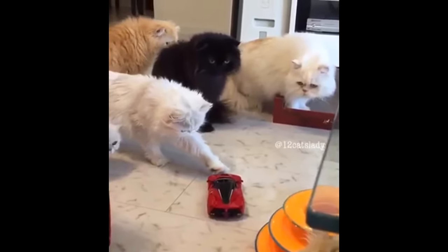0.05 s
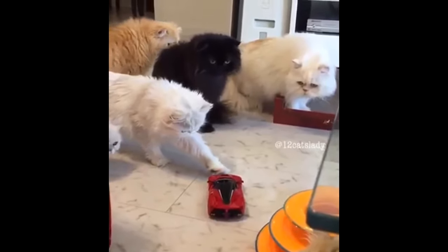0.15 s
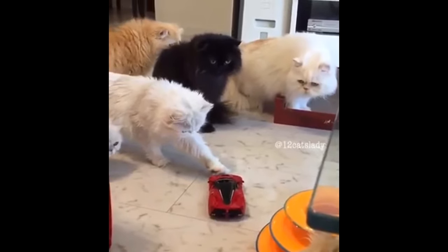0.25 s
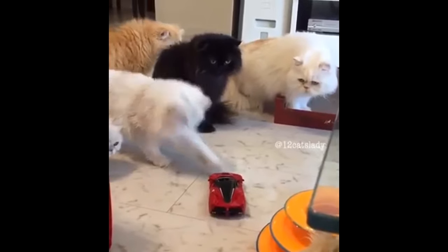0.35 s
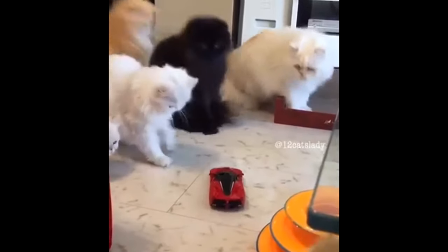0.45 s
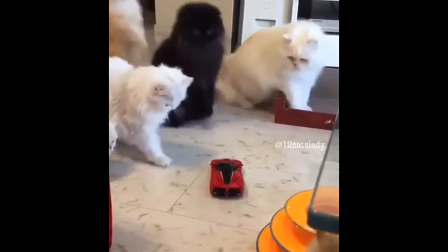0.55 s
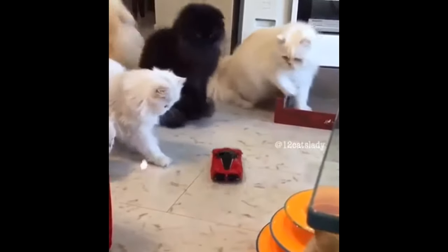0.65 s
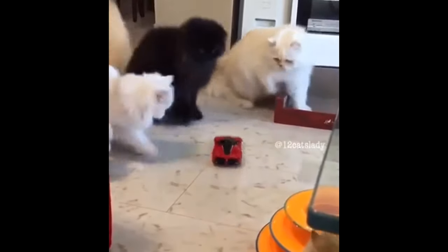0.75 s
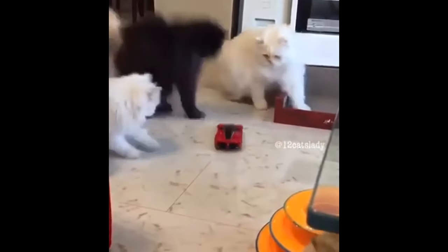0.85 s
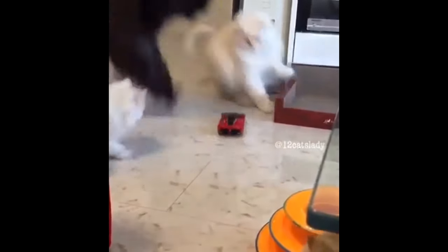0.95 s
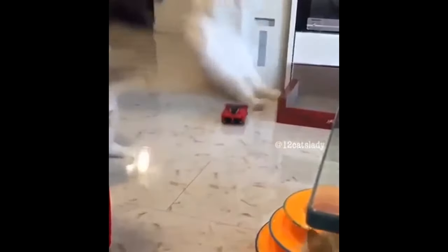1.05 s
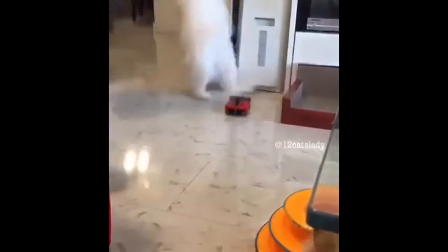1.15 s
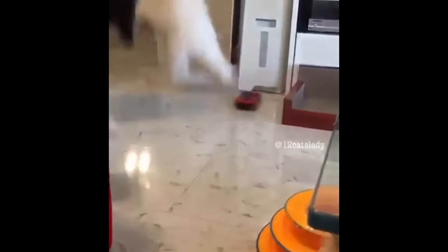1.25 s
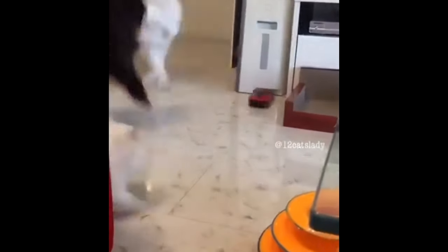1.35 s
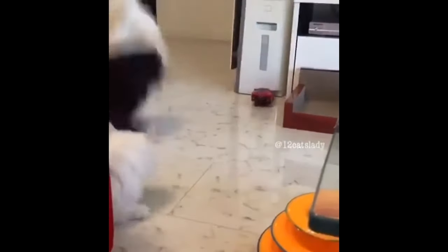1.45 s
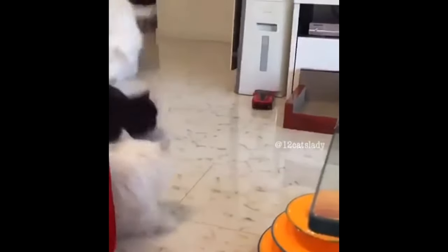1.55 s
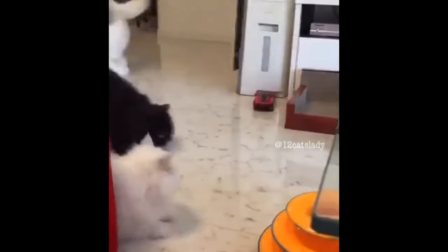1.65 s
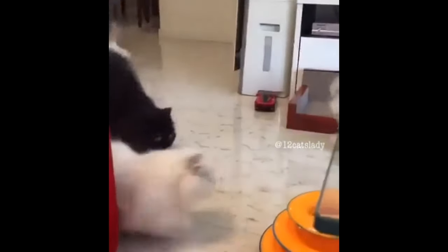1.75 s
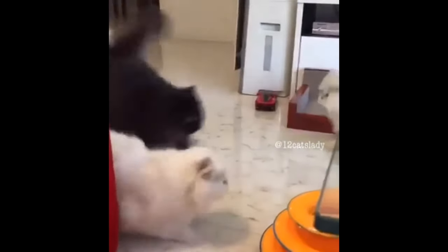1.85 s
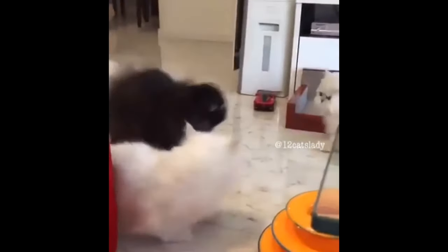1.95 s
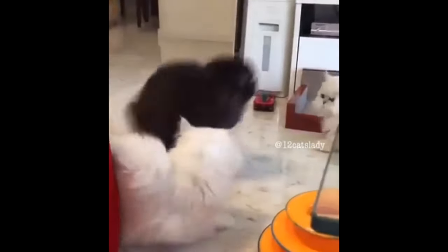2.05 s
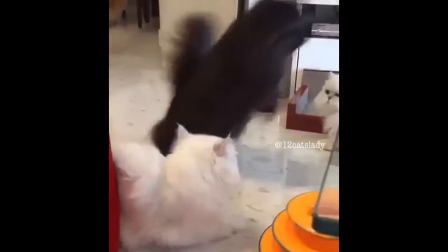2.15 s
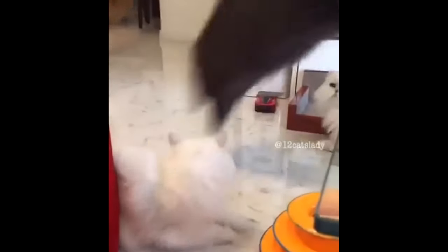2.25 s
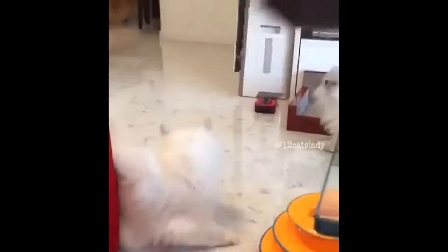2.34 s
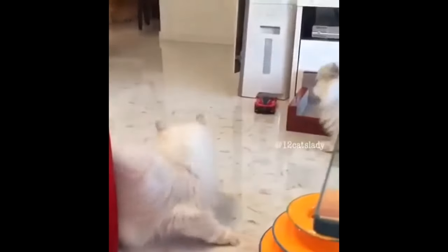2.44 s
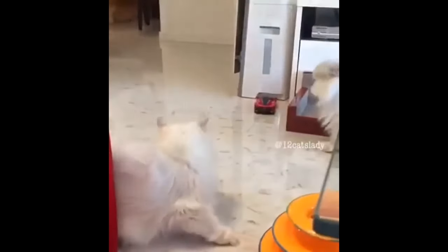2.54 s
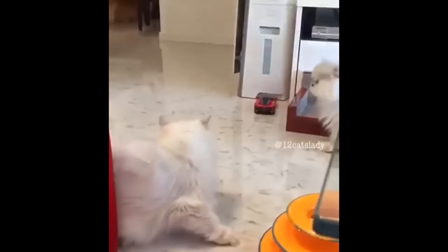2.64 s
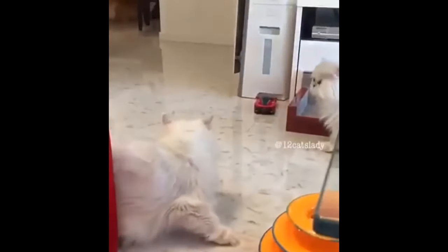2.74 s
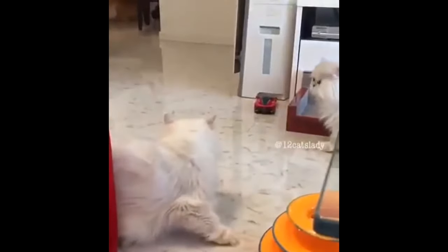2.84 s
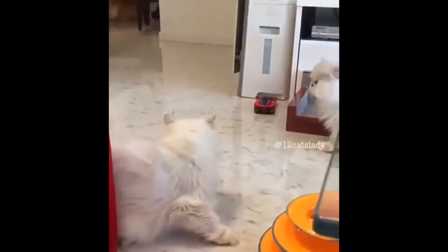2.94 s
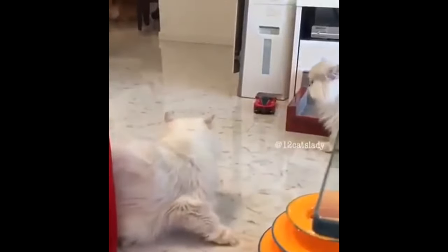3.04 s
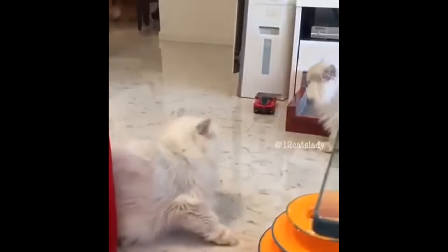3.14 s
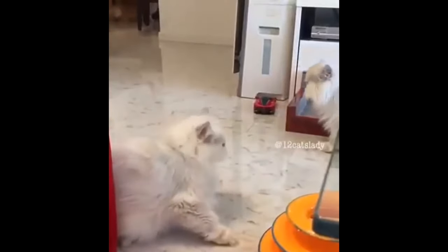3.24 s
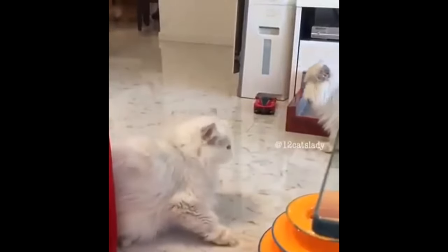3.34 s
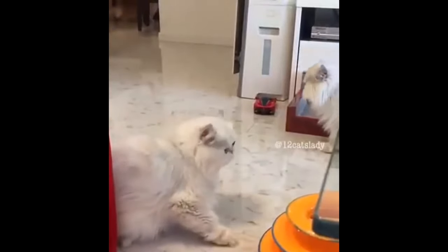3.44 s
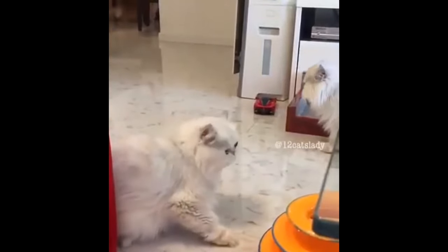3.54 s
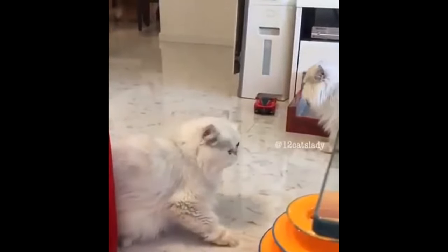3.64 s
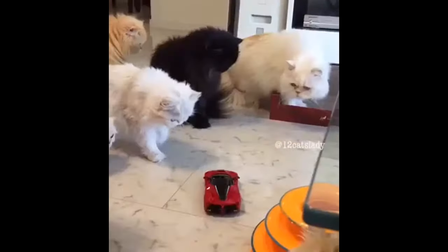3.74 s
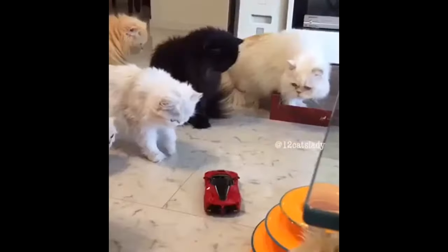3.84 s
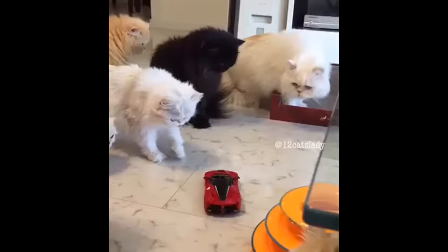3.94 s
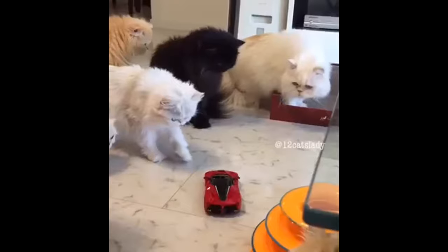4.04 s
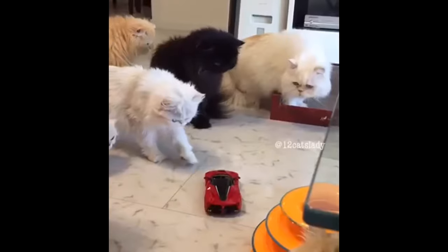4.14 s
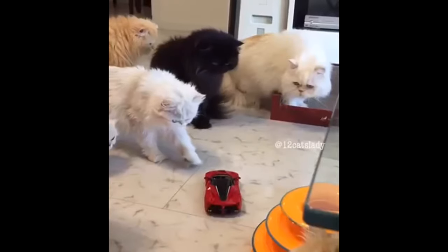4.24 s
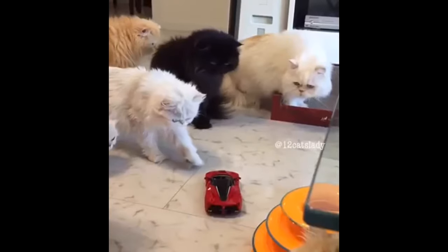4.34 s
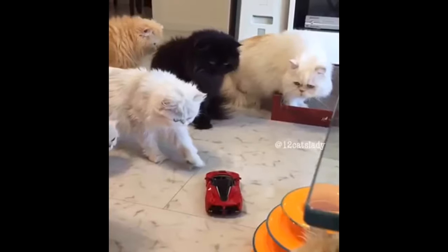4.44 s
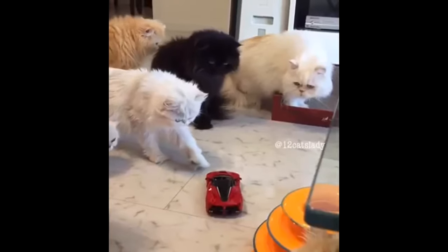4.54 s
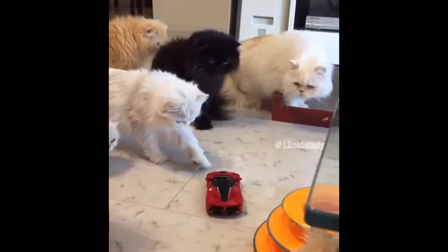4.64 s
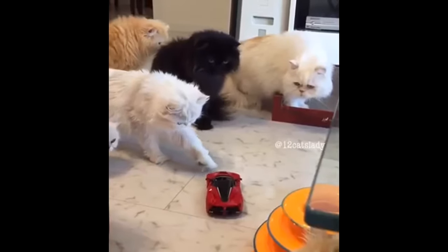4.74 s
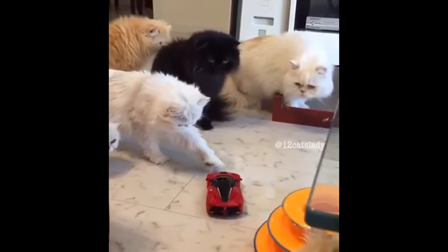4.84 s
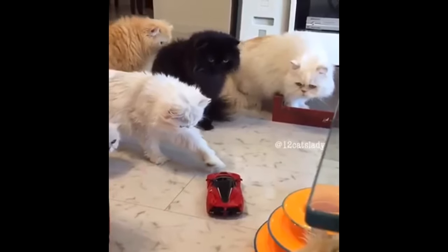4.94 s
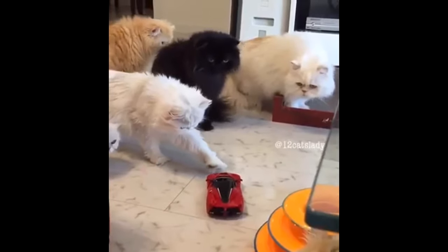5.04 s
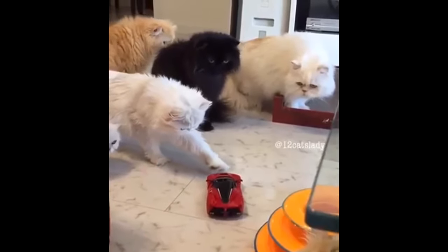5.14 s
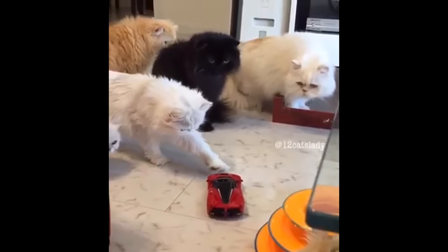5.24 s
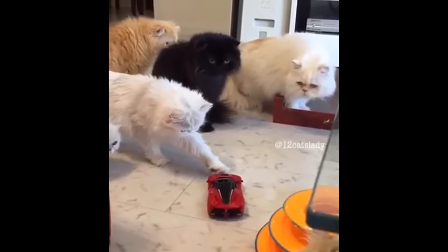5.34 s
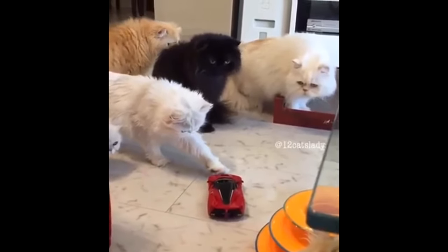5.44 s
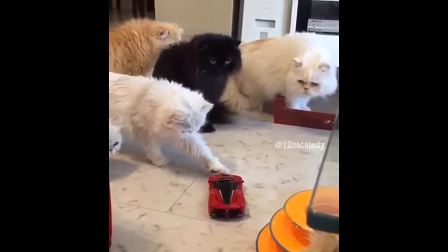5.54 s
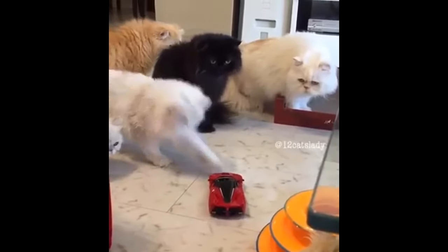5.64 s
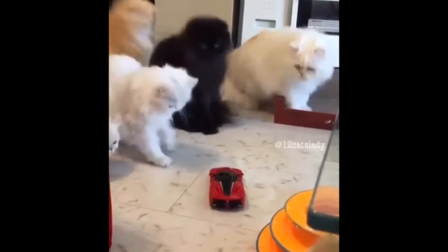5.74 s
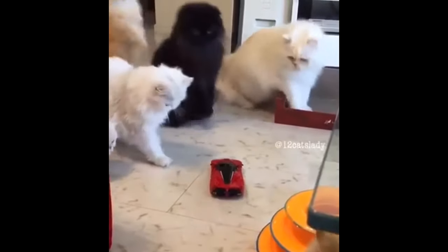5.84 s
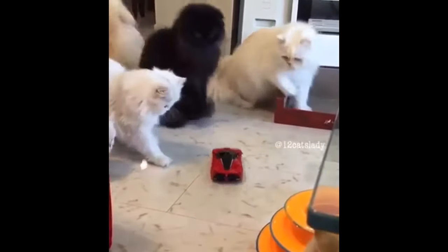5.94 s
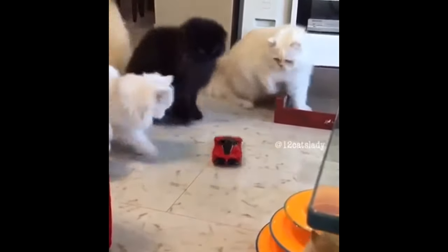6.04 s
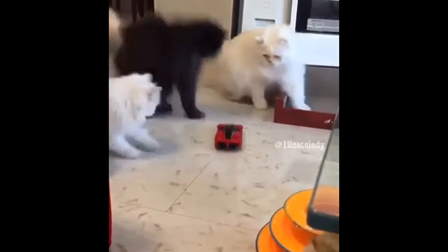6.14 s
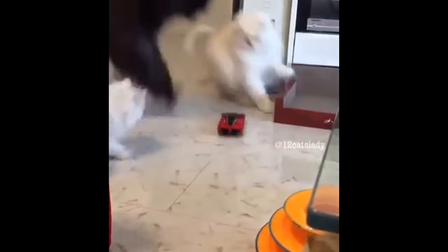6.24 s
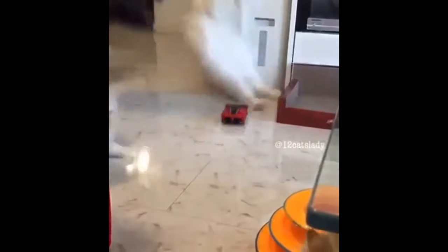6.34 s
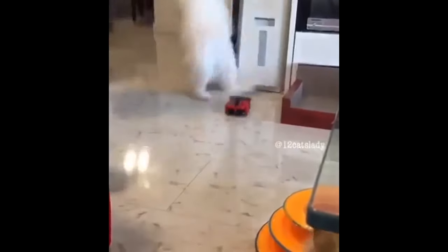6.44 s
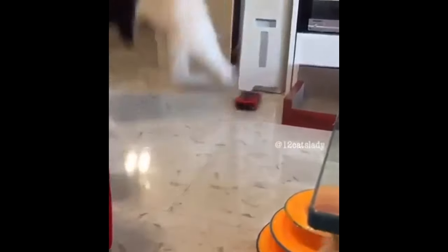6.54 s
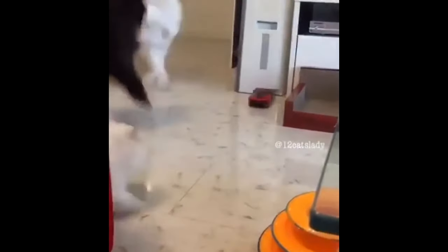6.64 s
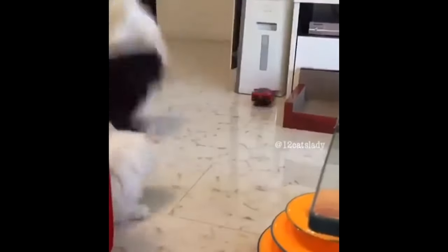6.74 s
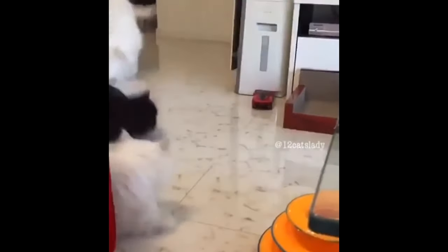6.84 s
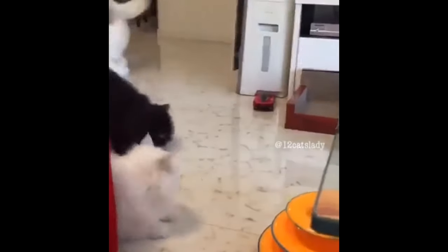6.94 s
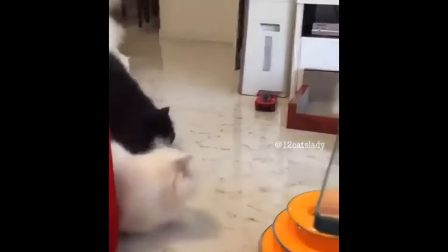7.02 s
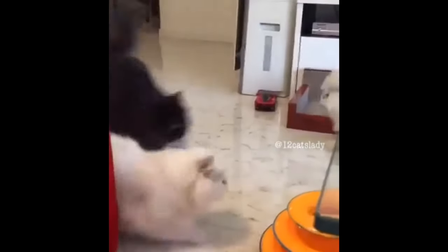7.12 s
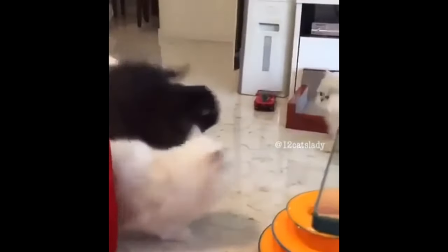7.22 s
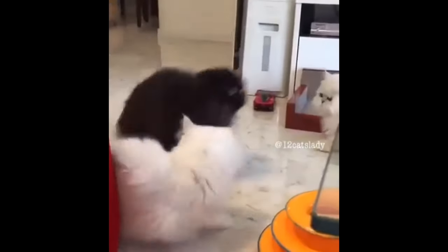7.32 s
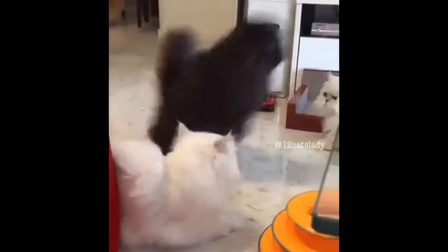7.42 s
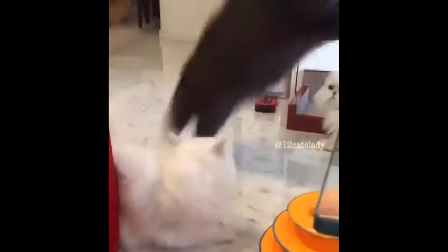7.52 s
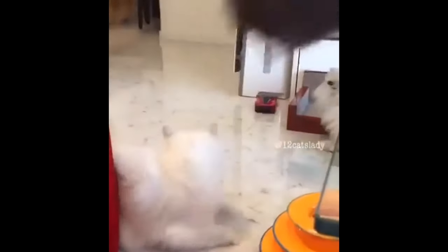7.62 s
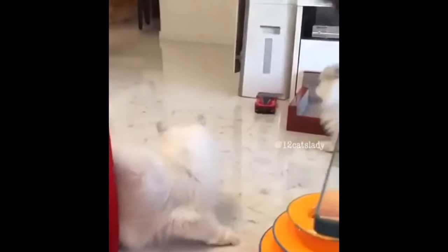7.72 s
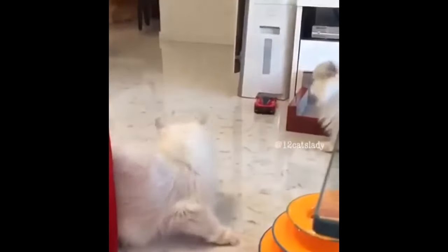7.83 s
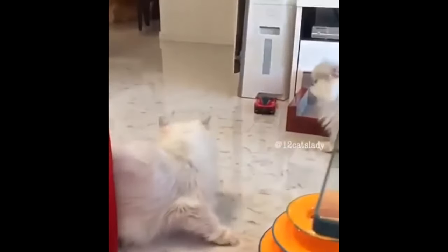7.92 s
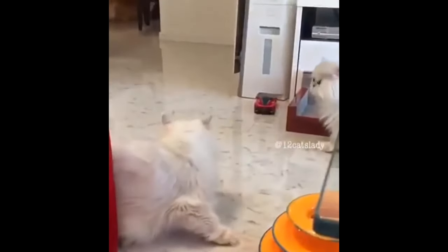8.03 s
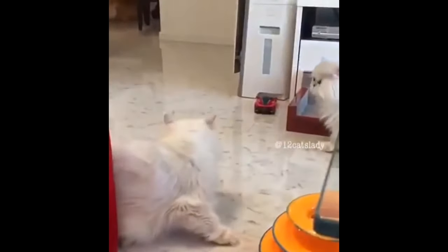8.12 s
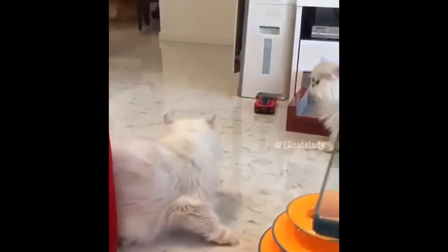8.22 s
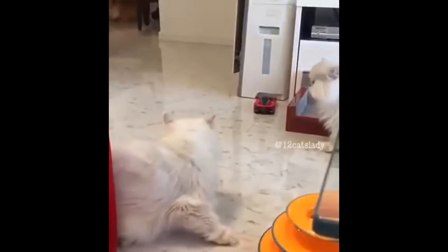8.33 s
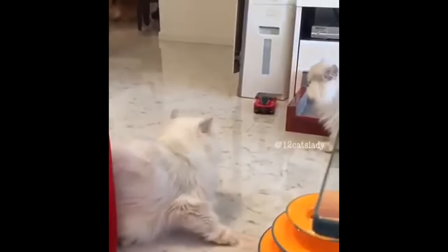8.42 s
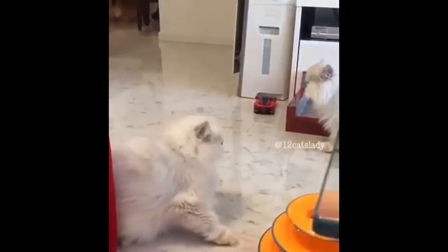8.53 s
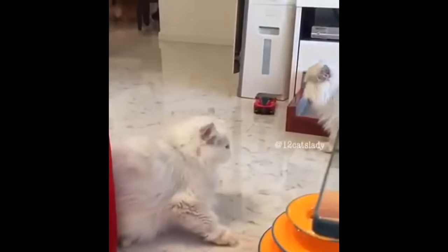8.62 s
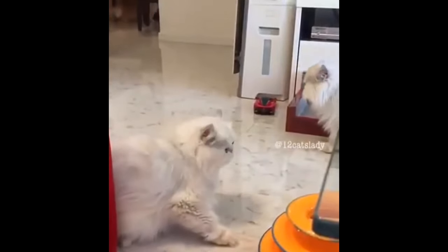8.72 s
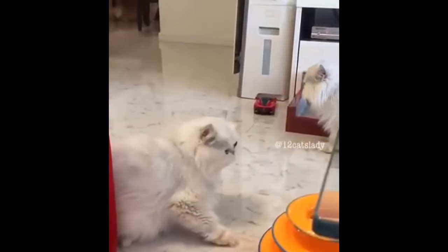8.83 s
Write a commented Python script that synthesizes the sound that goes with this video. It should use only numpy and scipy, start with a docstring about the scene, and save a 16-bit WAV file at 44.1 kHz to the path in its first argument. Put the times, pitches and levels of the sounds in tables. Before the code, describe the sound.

In a quiet tiled room, a tiny motor whines briefly before cats bolt, thudding, scraping and banging plastic and card, twice over.

```python
"""Quiet tiled room: a toy car whirs off among cats, who bolt; paws pound, claws skid, plastic and card get knocked.
After a short silence the same moment plays again, from a little earlier.
Random contacts excite swept resonators (car), floor modes (paws) and shell modes (knocks).
Spectrally shaped grit and noise make claws and air; sines make the hum; sparse taps make the reverb."""
import sys
import numpy as np
from scipy import signal
from scipy.fft import rfft, irfft
from scipy.io import wavfile
from scipy.ndimage import uniform_filter1d

SR = 44100
rng = np.random.default_rng(int(sys.argv[2]) if len(sys.argv) > 2 else 0)


def generate_wav(signal):
    """Clip the signal to [-1, 1] and save it as 16-bit WAV at the path in sys.argv[1]."""
    frames = np.transpose(np.atleast_2d(signal))
    scaled = np.clip(frames, -1, 1) * 32767
    pcm = np.round(scaled).astype(np.int16)
    wavfile.write(sys.argv[1], SR, pcm)


N = 391475

LOOP_N = 233964  # samples until the moment repeats
SILENCE_FROM_S, SILENCE_TO_S = 3.801, 3.837
BAND_LIMIT_HZ = 12150
AIR_DB = -59.5  # rms
ROOM_DB = -12.5  # reverb against direct sound

# Room air spectrum: f/Hz, relative density/dB per Hz
AIR_SPECTRUM = [(15, -46.5), (30, -27.5), (50, -9), (70, -8.5), (95, -6.5), (150, -11.5), (240, -17),
                (370, -15), (450, -20.5), (1220, -29), (1800, -34.5), (11500, -42), (12800, -59)]
# Mains hum partials: f/Hz, rms wavering/dB, rms level/dB
HUM_PARTIALS = [(62.6, 0, -67.5), (117.3, 3.5, -57), (277, 6, -75)]
# Reverb decay: f/Hz, t60/s
ROOM_T60 = [(100, 0.34), (500, 0.28), (2000, 0.12), (6000, 0.25), (12000, 0.26)]

# Small plastic ticks: t/s, peak level/dB, f/Hz, peak level of sharp edge/dB
TICK_EVENTS = [(0.134, -46, 1960, -70), (0.3379, -20.5, 1080, -25), (3.8928, -32, 1370, -32.5),
               (3.9315, -27.5, 1200, -28.5), (4.426, -41, 1480, -60), (4.794, -53, 1390, -64),
               (5.064, -50, 1368, -72)]

# Whirr of gear teeth: f/Hz, relative density/dB per Hz
WHIRR_SPECTRUM = [(350, -37), (600, 5), (1460, -6), (1680, 6.5), (3980, -2.5), (5690, -7), (11400, -18),
                  (12500, -34.5), (22000, -120)]
# Gear catches: t/s, f after the catch/Hz, climb/Hz per s, whine gain at the catch/dB
GEAR_CATCHES = [(0.346, 3700, 490, -80), (.46, 3750, 600, -63), (0.545, 3930, 1480, -51),
                (0.645, 3640, 5580, -47), (0.759, 3730, 4670, -44), (0.857, 3520, 3800, -41),
                (0.94, 3930, 2500, -48)]
# Whirr at motor on, grip, full, off: rms level/dB
WHIRR_STAGES_DB = (-59, -56, -59, -57.5)
MOTOR_ON_S, MOTOR_GRIP_S, MOTOR_FULL_S, MOTOR_OFF_S = 0.31, 0.59, 0.91, 1.01
WHINE_FADE_DB_PER_S, WHINE_FLICKER_DB = 12.0, 2  # fade after each catch; rms flicker
CATCH_S = 0.0067  # smoothing of each jump

# Running cats: t/s, paw level/dB, scuff level/dB, skid level before tilt and patches/dB, skid tilt/dB per octave
SCRAMBLE_CURVES = [(0.42, -55, -52.5, -75, -20), (0.56, -46, -56, -57.5, -1.5),
                   (0.8, -34.5, -47.5, -51, -2), (1.04, -32.5, -34, -44.5, 2),
                   (1.2, -37, -35.5, -45.5, -3.5), (1.27, -28.5, -28.5, -32, 0),
                   (1.33, -28.5, -34, -29.5, -4), (1.41, -28.5, -33.5, -36, 7), (1.5, -30, -31, -31, 0.5),
                   (1.54, -25.5, -26.5, -32.5, -3), (1.6, -31, -27.5, -26.5, -3),
                   (1.79, -32, -36.5, -38, 1.5), (1.85, -28.5, -36.5, -36.5, -2.5),
                   (1.96, -35.5, -34.5, -32.5, -4.5), (2.08, -32, -39.5, -40.5, 5),
                   (2.24, -33.5, -41, -41.5, -0.5), (2.5, -47, -56.5, -50, 1.5),
                   (2.67, -42.5, -38, -62.5, 6.5), (2.76, -48, -51, -72, -6.5), (2.93, -65, -100, -85, -7)]
# Claws on glaze: f/Hz, relative density/dB per Hz
SKID_SPECTRUM = [(410, -33), (700, -8), (935, -10.5), (1050, 0), (1330, -11), (1820, -4.5), (3700, -7.5),
                 (9470, -16), (11800, -20), (12500, -30), (22000, -120)]
# Floor resonances: f/Hz, width/Hz, relative level/dB
FLOOR_RESONANCES = [(73, 21, 1.5), (96, 40, 0.5), (125, 22, 0), (165, 53, -1), (218.8, 75, -3)]
# Hollow plastic and card: f/Hz, width/Hz, relative level/dB
SHELL_RESONANCES = [(255, 28, 1.5), (297, 25, 3), (376, 48, 4), (510, 55, -1), (636, 79, 0), (816, 50, -7),
                    (909, 38, -7), (1177, 210, -1.5), (1337, 69, -5.5), (1540, 78, -10), (1874, 41, -4.5),
                    (2330, 300, 1.5), (2520, 370, -0.5), (3284, 76, 2.5), (4280, 130, -10.5)]

# Landings: t/s, peak level/dB, centre f/Hz, shake t60/s before shortening,
# level of the paw rumble that follows, before its rise and fall/dB
LANDINGS = [(0.485, -34.5, 87, 0.27, -56.5), (0.626, -21.5, 77, 0.54, -30.5),
            (0.785, -24.5, 170, 0.36, -23), (1.058, -13.5, 96, 0.18, -23.5),
            (1.26, -13.5, 118.1, 0.3, -9.5), (1.34, -24.5, 133, 0.16, -25), (1.551, -7, 157, 0.19, -7.5),
            (1.594, -5.5, 72.4, .35, -21), (1.79, -20.5, 71.4, .2, -48), (1.979, -20, 129, 0.19, -29),
            (2.289, -22.5, 82, 0.2, -61), (2.496, -32, 73, 0.21, -69), (2.556, -28.5, 199, 0.33, -29),
            (2.668, -40, 160.7, 0.29, -27)]
RUMBLE_RISE_S, RUMBLE_FALL_DB_PER_S = 0.011, 237.5
JOSTLE_DB = -15  # jostled things against the rumble
PAW_PUSH_CYCLES, PAW_SHAKE = 1.8, 0.08  # springy push length; gain of uneven shaking

# Blows on shells: t/s, peak level/dB, centre f/Hz, reach/octaves, rattle t60/s,
# ring share against knock/0-1, peak crack level/dB, rise/s
BLOW_EVENTS = [(0.738, -24.5, 900, 0.8, 0.16, 0.63, -61.5, .0003),
               (.787, -17.5, 690, 0.92, 0.22, 0.56, -62, .0003),
               (.79, -32.5, 2700, 0.4, 0.12, 0.3, -60, 0.0033),
               (.982, -21, 800, 0.4, 0.02, 0.57, -59, .0003),
               (1.125, -7, 915, 0.24, 0.18, 0.37, -19, 0.00063),
               (1.216, -17, 1170, 0.88, 0.14, 0.7, -52.5, .0003),
               (1.259, 1.5, 910, 1.37, 0.14, 0.53, -26, 0.00043),
               (1.278, -14.5, 1350, 0.13, 0.24, .7, -50.5, .002),
               (1.335, -9.5, 3400, 1.4, 0.084, 0.3, -15.5, 0.00024),
               (1.489, -12, 985, 0.64, 0.074, 0.36, -21, .0003),
               (1.553, -3, 610, 1.5, 0.26, 0.47, -31.5, .0005),
               (1.827, -17, 2000, 0.3, 0.078, 0.55, -48, .014),
               (1.982, -22.5, 1100, 0.4, 0.045, 0.5, -46, 0.0033),
               (1.987, -16.5, 456, 0.79, 0.46, 0.3, -60, 0.0016),
               (2.134, -24, 940, 0.73, 0.3, 0.66, -55, 0.0049),
               (2.247, -27, 3360, 0.53, 0.24, 0.32, -27, 0.0012),
               (2.341, -26.5, 1700, 0.7, 0.064, 0.17, -54, .001),
               (2.549, -30, 1500, 0.48, 0.3, 0.48, -72, .002),
               (2.555, -19.5, 400, 0.42, 0.19, 0.75, -72, 0.0078),
               (2.57, -29, 904, 0.39, 0.14, 0.42, -72, 0.0029),
               (2.658, -41.5, 1490, 0.61, 0.32, 0.33, -72, 0.0047),
               (2.662, -22, 393, 0.56, 0.33, 0.65, -76, .002)]
# Sudden claw slips: t/s, starting level/dB, tilt above 2.5 kHz/dB per octave, t60/s, rise/s
SLIP_EVENTS = [(1.122, -25.5, -10, .3, 0.00087), (1.336, -20.5, -0.5, 0.28, .0012),
               (1.449, -34, 4, 0.75, .004), (1.879, -23, -8, 0.52, 0.014), (2.246, -30, -13, 0.14, 0.0018),
               (2.386, -25, -3.5, 0.14, 0.0019), (2.394, -28, -6.5, 0.28, 0.0026)]


def gain_of(db):
    """Decibels to amplitude."""
    return 10 ** (np.asarray(db) / 20)


def evened(x):
    """Scales to rms 1."""
    return x / np.sqrt(np.mean(x ** 2) + 1e-20)


def peaked(x):
    """Scales to peak 1."""
    return x / (abs(x).max() + 1e-20)


def read(points, hz):
    """Table interpolated on log frequency."""
    f, value = np.transpose(points)
    return np.interp(np.log(hz + 1), np.log(f + 1), value)


def curves(rows):
    """Start time and each column, sample by sample."""
    s, *columns = np.transpose(rows)
    t = np.arange(s[0], s[-1], 1 / SR)
    return s[0], [np.interp(t, s, c) for c in columns]


def add(mix, s, sound):
    """Mixes a sound in at a time."""
    part = mix[round(s * SR):][:len(sound)]
    part += sound[:len(part)]


def drift(size, per_s):
    """Slow random wander of rms 1."""
    span = round(SR / per_s)
    once = uniform_filter1d(rng.standard_normal(size), span)
    return evened(uniform_filter1d(once, span))


def grit(size, per_s, spread_db, hiss):
    """Random contacts of uneven strength over a fine hiss."""
    strength = gain_of(spread_db * np.minimum(rng.exponential(1, size), 4))
    taps = strength * (rng.random(size) < per_s / SR)
    return evened(taps * rng.choice([-1, 1], size)) + hiss * rng.standard_normal(size)


def burst(rise_s, t60, length_s=0.9):
    """Noise that rises quickly and dies away."""
    t = np.arange(round(length_s * SR)) / SR
    return rng.standard_normal(len(t)) * (1 - np.exp(-t / rise_s)) * gain_of(-60 * t / t60)


def coloured(x, points):
    """Filters x by a spectrum table, then scales to rms 1."""
    hz = np.fft.rfftfreq(len(x), 1 / SR)
    return evened(irfft(rfft(x) * gain_of(read(points, hz)), len(x)))


def above(x, hz, order=2):
    """High-pass."""
    return signal.sosfilt(signal.butter(order, hz, "high", fs=SR, output="sos"), x)


def band(x, centre_hz, octaves):
    """Steep band-pass, octaves to each side of a centre."""
    edges = np.clip(centre_hz * 2.0 ** np.array([-octaves, octaves]), 20, 0.45 * SR)
    return signal.sosfilt(signal.butter(3, edges, "band", fs=SR, output="sos"), x)


def bump(hz, centre_hz, octaves):
    """A broad hill in dB: -6 dB at the given octaves from its centre."""
    return -6 * (np.log2(hz / centre_hz) / octaves) ** 2


def resonate(x, hz, width):
    """Resonator of moving pitch: shifts the curve hz down to zero, smooths, shifts back."""
    turn = np.exp(2j * np.pi * np.cumsum(hz * np.ones(len(x))) / SR)
    r = np.exp(-np.pi * width / SR)
    return 2 * (turn * signal.lfilter([1 - r], [1, -r], x / turn + 1e-18)).real


def body(x, modes):
    """x through parallel modes, neighbours in opposite phase."""
    return sum((-1) ** k * gain_of(db) * resonate(x, hz, width) / np.sqrt(width)
               for k, (hz, width, db) in enumerate(modes))


def quiet():
    """Shaped noise for room air, wavering mains hum, and a faint narrow-band drone that comes and goes."""
    air = gain_of(AIR_DB) * coloured(rng.standard_normal(LOOP_N), AIR_SPECTRUM)
    t = np.arange(LOOP_N) / SR
    hum = sum(gain_of(db + waver_db * drift(LOOP_N, 22.0)) * np.sqrt(2) * np.sin(2 * np.pi * hz * t)
              for hz, waver_db, db in HUM_PARTIALS)
    drone = evened(band(rng.standard_normal(LOOP_N), 350.0, 0.16))
    drone = gain_of(-73.0 + 6.5 * drift(LOOP_N, 14.0)) * drone
    return np.roll(air + hum + drone, round(SILENCE_TO_S * SR))  # hides the loop seam at the silence


def ticks(mix):
    """Small dry plastic clicks: a short scratch rings its own pitch and two damped modes."""
    for s, db, hz, edge_db in TICK_EVENTS:
        snap = burst(0.00048, 0.021, 0.04)
        snap[30] += 3.0  # one firm contact inside the scratch
        modes = body(snap, [(hz, 240.0, 0), (2200.0, 350.0, -7), (850.0, 300.0, -11)])
        click = above(peaked(modes), 400.0) + 0.31 * peaked(band(snap, 2480.0, 0.3))
        edge = band(snap, 3070.0, 1.0) + 0.2 * above(snap, 4800.0)
        add(mix, s, gain_of(db) * peaked(click))
        add(mix, s, gain_of(edge_db) * peaked(edge))


def room(x):
    """Reverb: sparse taps of random sign, each band dying at its own speed."""
    taps = np.zeros(SR // 2)
    at = np.arange(150, len(taps) - 20, 20)
    taps[at + rng.integers(0, 20, len(at))] = rng.choice([-1.0, 1.0], len(at))
    hz, t, z = signal.stft(taps, SR, nperseg=256)
    decay = gain_of(-60 * t / read(ROOM_T60, hz)[:, None])
    tail = signal.istft(z * decay, SR, nperseg=256)[1]
    return signal.fftconvolve(x, tail / np.linalg.norm(tail))[:len(x)]


def motor():
    """Whine pitch jumps at each gear catch, then climbs; the whine fades from each catch. Also whirr level."""
    t = np.arange(MOTOR_ON_S, MOTOR_OFF_S, 1 / SR)
    at, start_hz, climb, catch_db = np.transpose(GEAR_CATCHES)
    last = np.clip(np.searchsorted(at, t) - 1, 0, None)
    since = t - at[last]
    hz = start_hz[last] + climb[last] * since
    whine_db = catch_db[last] - WHINE_FADE_DB_PER_S * since + WHINE_FLICKER_DB * drift(len(t), 54.0)
    stages = (MOTOR_ON_S, MOTOR_GRIP_S, MOTOR_FULL_S, MOTOR_OFF_S)
    span = round(CATCH_S * SR)
    whirr_db = np.interp(t, stages, WHIRR_STAGES_DB)
    return uniform_filter1d(hz, span), uniform_filter1d(whine_db, span), whirr_db


def car(mix):
    """The gear mesh whines unsteadily inside a broad band, a second gear pair lower, over a whirr of teeth."""
    hz, whine_db, whirr_db = motor()
    teeth = grit(len(hz), per_s=3700, spread_db=7.5, hiss=2.4)
    hz = hz * (1 + 0.014 * drift(len(hz), 60.0))  # the mesh slips and catches
    mesh = evened(resonate(resonate(teeth, hz, 110.0), hz, 190.0))
    second_pair = evened(resonate(teeth, 0.83 * hz, 90.0))
    core = np.sin(2 * np.pi * np.cumsum(hz) / SR)  # clean mesh tone
    broad = evened(band(teeth, 3720.0, 0.25))
    whine = 0.5 * mesh + 0.32 * second_pair + 0.31 * core + 0.59 * broad
    whirr = coloured(teeth, WHIRR_SPECTRUM)
    fade = signal.windows.tukey(len(hz), 0.06)
    add(mix, MOTOR_ON_S, fade * (gain_of(whine_db) * whine + gain_of(whirr_db) * whirr))


def rumble(s, size):
    """Each landing sets off a quick swell of footfalls that dies away."""
    t = s + np.arange(size) / SR
    swell = np.zeros(size)
    for landing in LANDINGS:
        since = np.maximum(t - landing[0], 0)
        rise = 1 - np.exp(-(since / RUMBLE_RISE_S) ** 2)
        swell += gain_of(landing[-1] - RUMBLE_FALL_DB_PER_S * since) * rise
    return swell


def skid_noise(size, bright_db):
    """Dense claw contacts, tilted in brightness and broken into shifting patches and squeaks."""
    skid = coloured(grit(size, per_s=2500, spread_db=3.5, hiss=0.9), SKID_SPECTRUM)
    hz, t, z = signal.stft(skid, SR, nperseg=256)
    hz, frames_by_bins = hz[:, None], z.shape[::-1]
    patches = uniform_filter1d(rng.standard_normal(frames_by_bins), 8, 0)
    patches = evened(uniform_filter1d(patches, 4, 1)).T
    squeaks = evened(uniform_filter1d(rng.standard_normal(frames_by_bins), 12, 0)).T
    squeaks = squeaks * gain_of(bump(hz + 1, 1400.0, 1.1))  # short narrow streaks, mid range
    tilt_db = np.log2((hz + 200) / 3000) * np.interp(t * SR, np.arange(size), bright_db)
    return signal.istft(z * gain_of(tilt_db + 2.3 * patches + 3.3 * squeaks), SR, nperseg=256)[1][:size]


def cats(mix):
    """Paws drum the floor, brush hollow things, and claws scrape the glaze."""
    s, (paws_db, scuff_db, skid_db, bright_db) = curves(SCRAMBLE_CURVES)
    size = len(paws_db)
    swell = rumble(s, size)
    steps = grit(size, per_s=58, spread_db=2.5, hiss=0.39)
    pound = evened(band(body(steps, FLOOR_RESONANCES), 120.0, 1.6))
    brushed = [(hz, width, db + 1.9 * drift(size, 14.0))  # mode balance wanders
               for hz, width, db in SHELL_RESONANCES[:-2]]
    brushing = grit(size, per_s=600, spread_db=4.5, hiss=0.68)
    scuff = evened(band(body(brushing, brushed), 550.0, 1.55))
    running = (gain_of(paws_db) + swell) * pound
    running += (gain_of(scuff_db) + gain_of(JOSTLE_DB) * swell) * scuff
    running += gain_of(skid_db) * skid_noise(size, bright_db)
    add(mix, s, signal.windows.tukey(size, 0.04) * running)


def thuds(mix):
    """A soft heavy landing pushes and shakes the floor modes near its centre."""
    for s, db, centre_hz, t60, _ in LANDINGS:
        near = [(hz, width, level + bump(hz, centre_hz, 0.36)) for hz, width, level in FLOOR_RESONANCES]
        push = PAW_SHAKE * burst(0.004, 0.7 * t60, 0.6)
        turns = np.arange(0, PAW_PUSH_CYCLES, centre_hz / SR)
        add(push, 0, 0.11 * np.hanning(len(turns)) * np.sin(2 * np.pi * turns))
        add(mix, s, gain_of(db) * peaked(band(body(push, near), 120.0, 2.6)))


def blows(mix):
    """A sharp push and a rattle ring the shell modes near the centre; the contact knocks and cracks."""
    for s, db, centre_hz, octaves, t60, share, crack_db, rise_s in BLOW_EVENTS:
        octaves, share = max(octaves, 0.15), np.clip(share, 0, 1)
        shift = 1 + 0.0074 * rng.standard_normal(len(SHELL_RESONANCES))  # no two pieces ring quite alike
        near = [(hz * k, width, level + bump(hz, centre_hz, octaves))
                for k, (hz, width, level) in zip(shift, SHELL_RESONANCES)]
        push = burst(0.002, t60)
        push = 0.06 * abs(push) * grit(len(push), per_s=700, spread_db=3.0, hiss=0.54)  # loose parts chatter
        push[20] += 1  # sharp push
        ring = band(body(push, near), centre_hz, 1.4 * octaves + 0.21)
        rise = 1 - np.exp(-np.arange(len(ring)) / SR / max(rise_s, 1e-4))
        contact = band(burst(0.5 / centre_hz, 14 / centre_hz), 1.026 * centre_hz, octaves + 0.65)
        contact += 0.27 * band(burst(0.004, t60), centre_hz, octaves + 0.3)
        knock = rise * (share * peaked(ring) + (1 - share) * peaked(contact))
        crack = band(burst(0.0005, 0.021), 5000.0, 0.95)
        add(mix, s, gain_of(db) * peaked(knock))
        add(mix, s, gain_of(crack_db) * peaked(crack))


def slips(mix):
    """Claws lose grip at once: a hiss of set brightness that fades."""
    t = np.arange(SR // 2) / SR
    for s, db, bright_db, t60, rise_s in SLIP_EVENTS:
        colour = [(500, -29.5), (2500, -0.5), (10000, 2 * bright_db), (20000, 3 * bright_db)]
        hiss = coloured(rng.standard_normal(len(t)), colour) * gain_of(-60 * t / t60)
        hiss = hiss + 0.08 * evened(body(hiss, SHELL_RESONANCES[-6:])) * np.std(hiss)  # nearby plastic sings
        add(mix, s, gain_of(db) * hiss * (1 - np.exp(-t / rise_s)))


def scene():
    """The moment with its reverb and room tone, repeated to fill N."""
    near = np.zeros(LOOP_N)
    for source in (ticks, car, cats, thuds, blows, slips):
        source(near)
    return np.resize(near + gain_of(ROOM_DB) * room(near) + quiet(), N)[None]


def record(dry):
    """Bass roll-off, clipping at full scale, the short silence, the band limit."""
    x = np.clip(above(dry, 50.0, order=4), -1, 1)
    t = np.arange(N) / SR
    outside_s = np.maximum(SILENCE_FROM_S - t, t - SILENCE_TO_S)
    x = x * np.clip(outside_s / 0.002, 0, 1)  # 2 ms fades
    low_pass = signal.firwin(511, BAND_LIMIT_HZ, window=("kaiser", 9), fs=SR)
    return signal.oaconvolve(x, low_pass[None], "same")


dry = scene()
out = record(dry)
generate_wav(out)
```